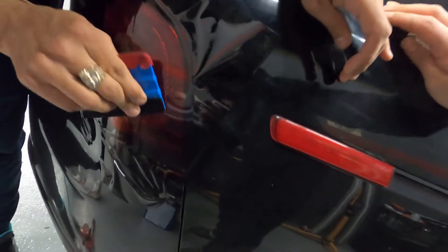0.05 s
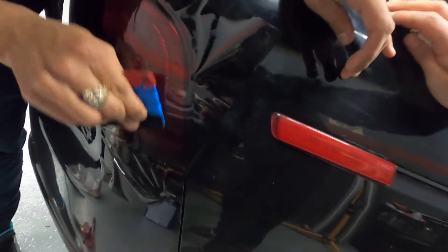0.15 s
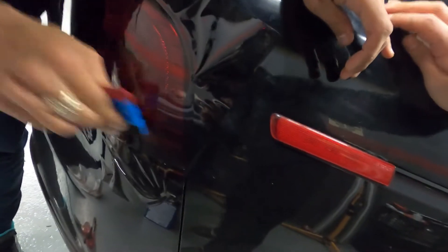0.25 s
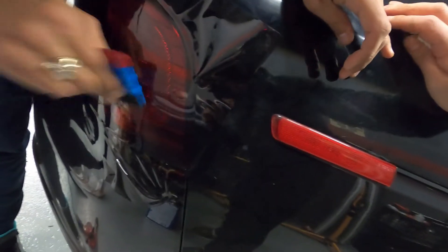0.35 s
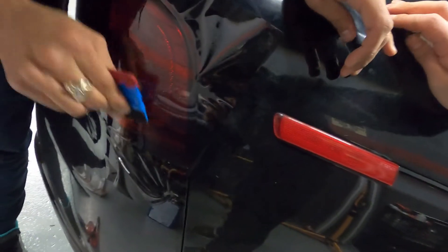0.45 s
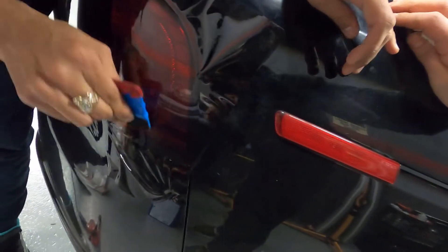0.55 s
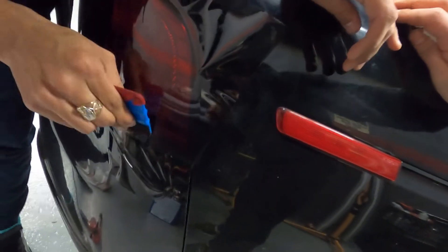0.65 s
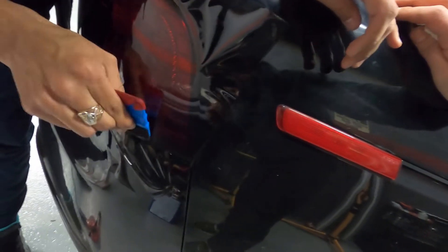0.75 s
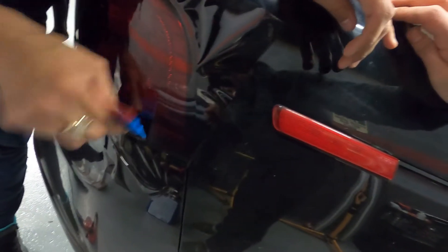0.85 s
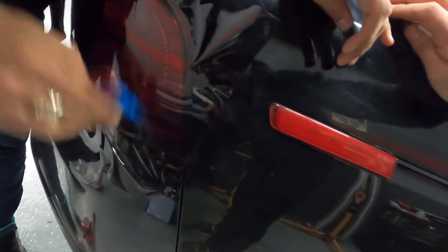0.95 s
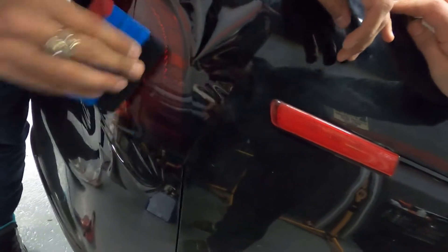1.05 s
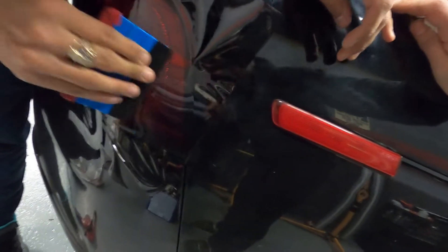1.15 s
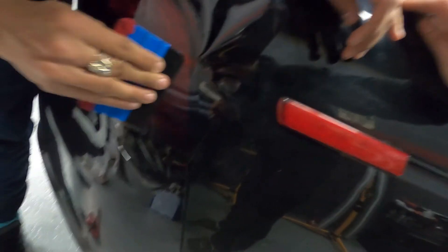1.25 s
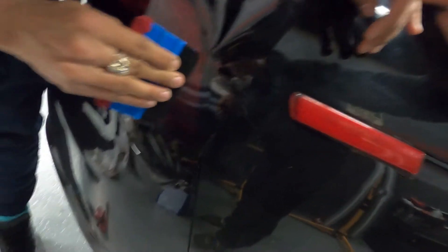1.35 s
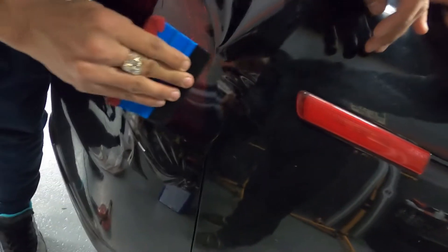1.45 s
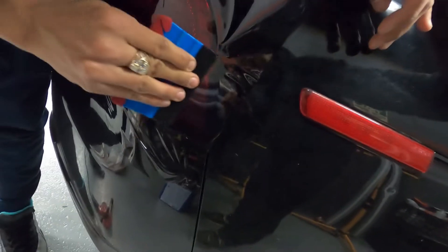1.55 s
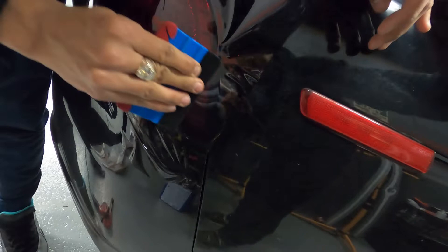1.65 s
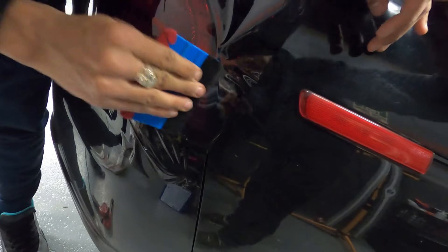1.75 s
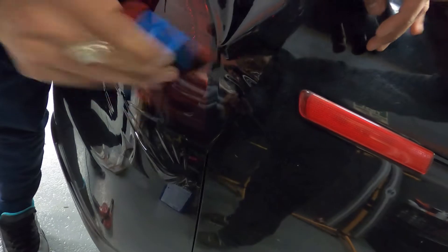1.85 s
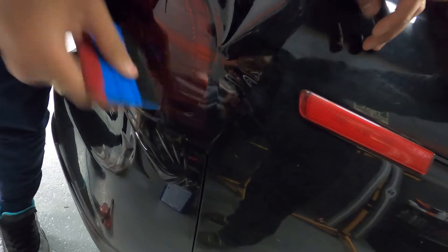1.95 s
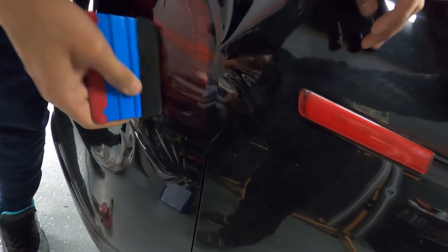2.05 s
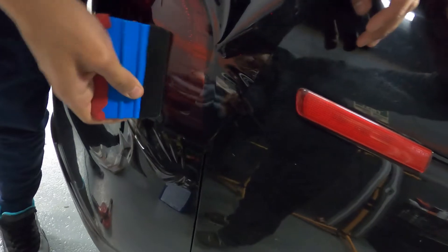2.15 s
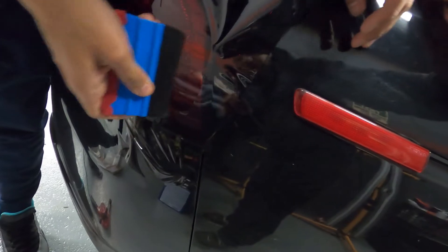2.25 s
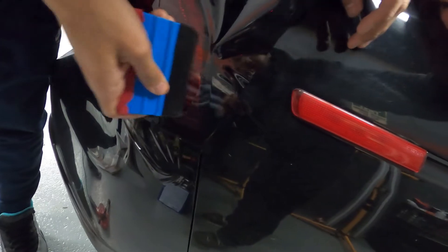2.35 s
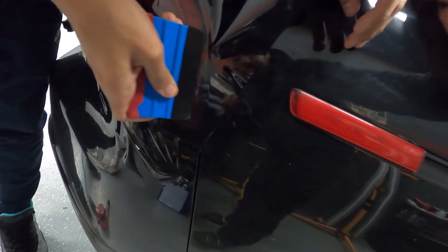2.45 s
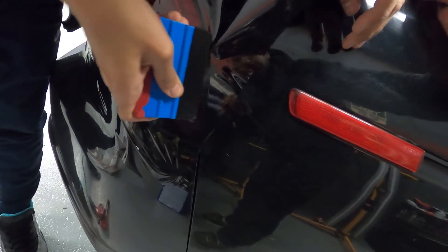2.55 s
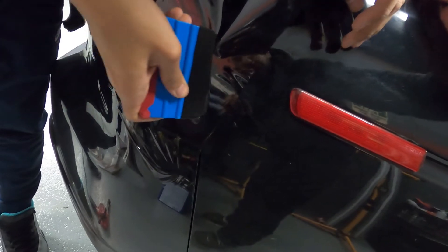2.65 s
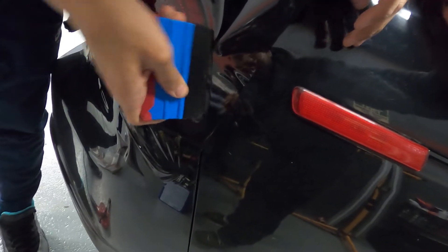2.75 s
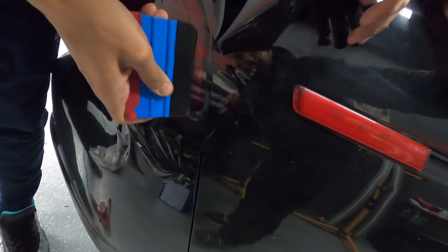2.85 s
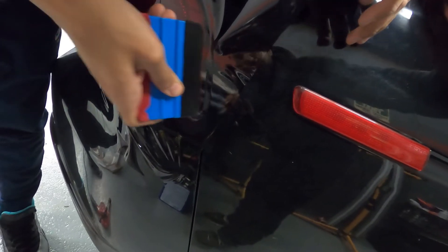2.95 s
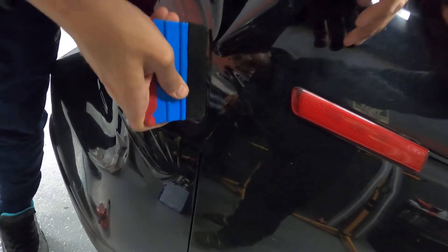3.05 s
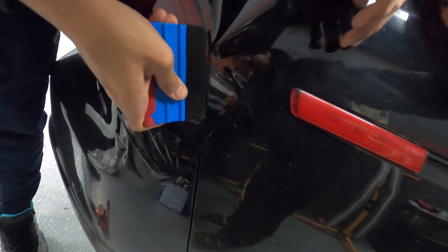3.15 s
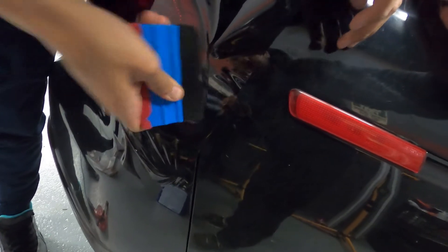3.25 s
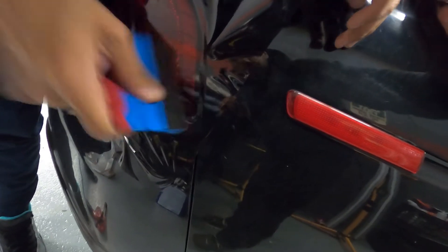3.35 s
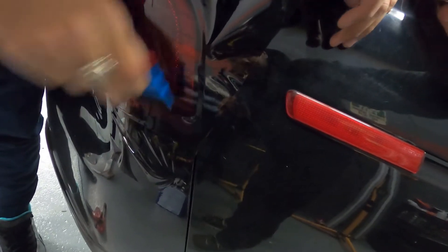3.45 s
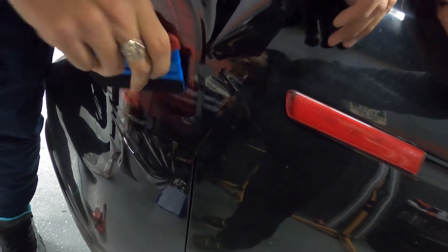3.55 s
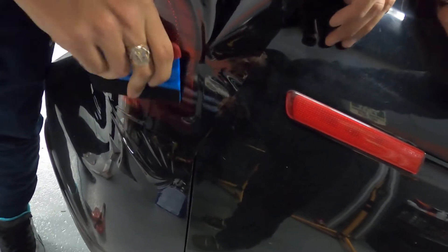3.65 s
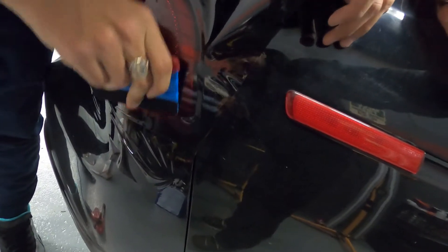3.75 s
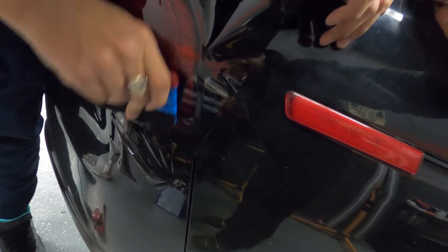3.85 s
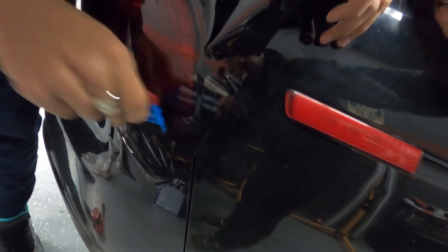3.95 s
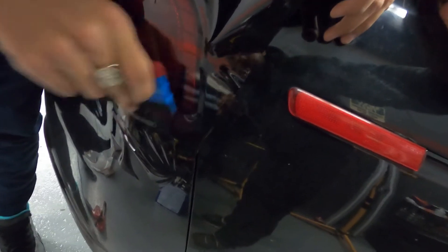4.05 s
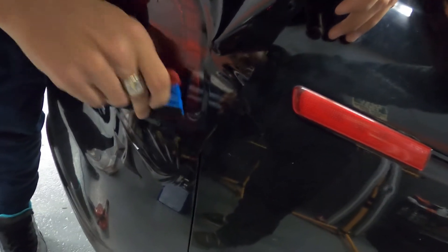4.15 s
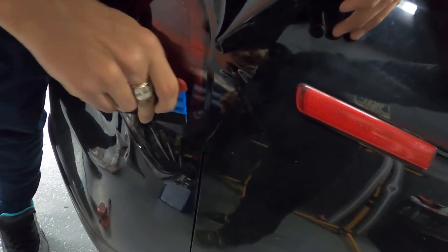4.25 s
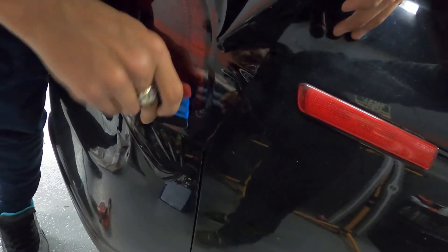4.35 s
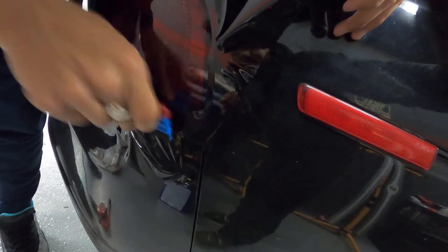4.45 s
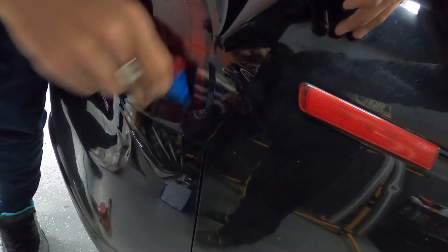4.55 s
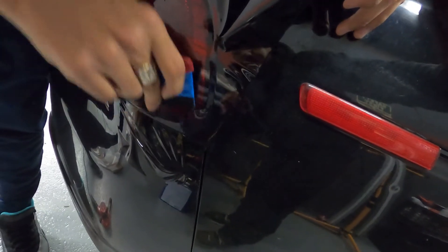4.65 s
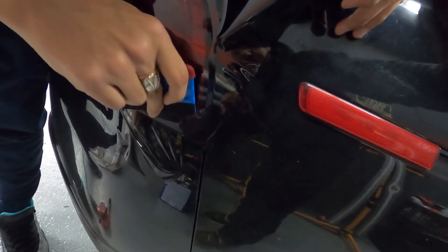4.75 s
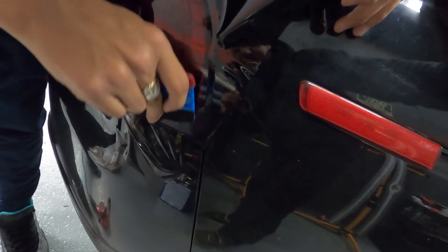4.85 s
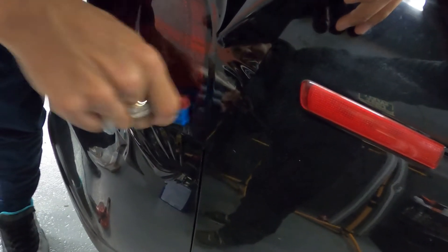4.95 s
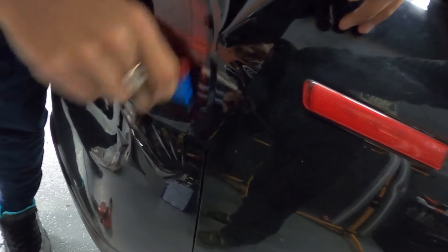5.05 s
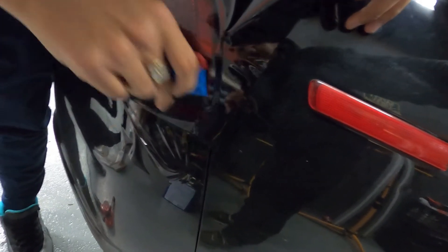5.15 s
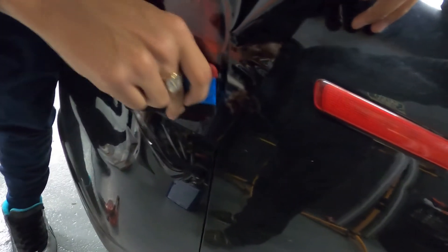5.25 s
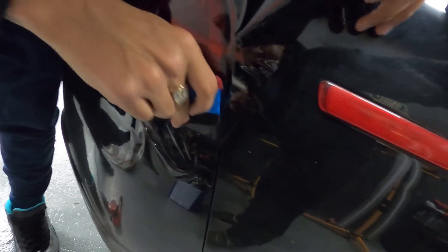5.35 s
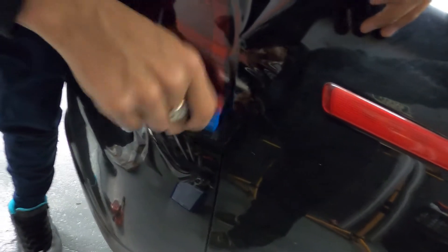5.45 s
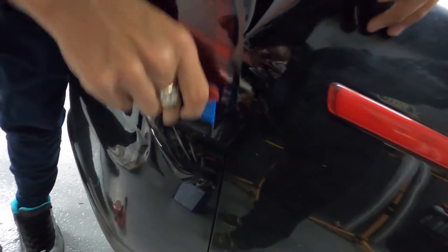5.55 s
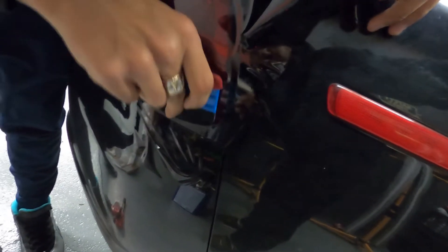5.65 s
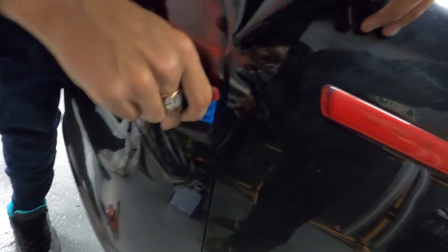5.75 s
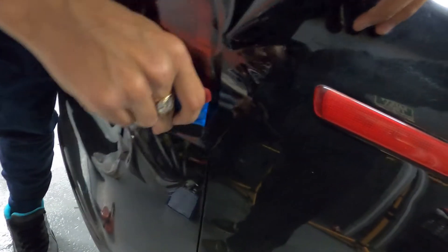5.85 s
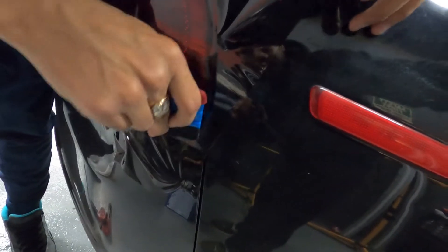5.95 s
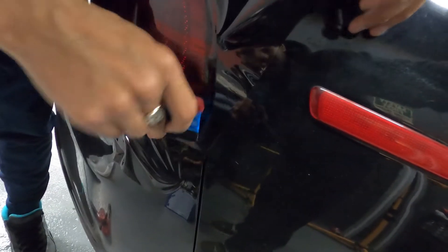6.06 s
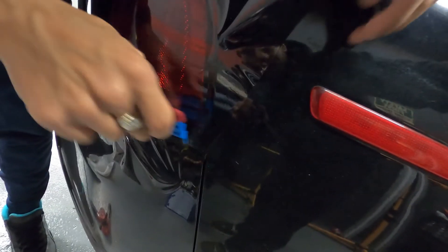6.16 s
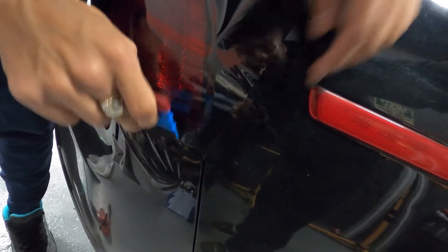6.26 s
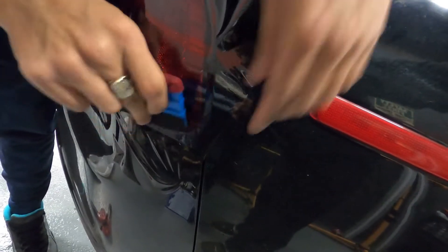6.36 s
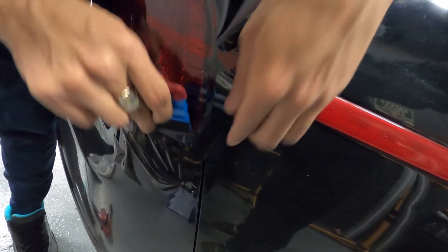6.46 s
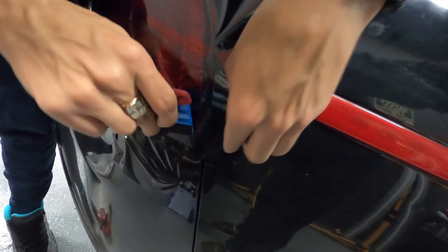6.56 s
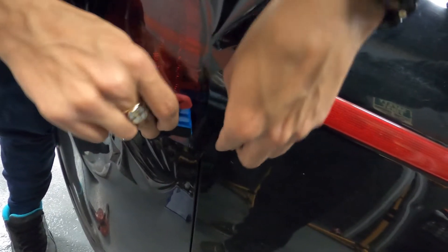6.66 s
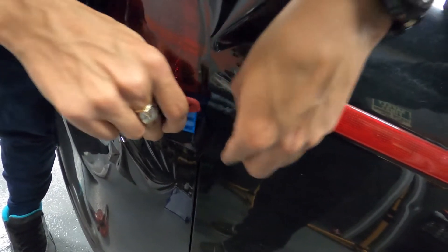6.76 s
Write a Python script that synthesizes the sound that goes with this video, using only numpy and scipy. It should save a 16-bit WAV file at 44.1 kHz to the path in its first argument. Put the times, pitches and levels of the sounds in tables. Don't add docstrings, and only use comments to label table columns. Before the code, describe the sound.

A small close stereo microphone hears a puff of air and a dull knock, then a dry squeegee glide and two firm clicks on a lamp. Quiet pressed scraping and tiny catches follow, then spaced clicks with hollow thuds. Two piercing film cracks arrive near the end, each followed by crisp fluttering scrape, and two last sharp taps fade into rubbing over low garage hum.

```python
import sys
import numpy as np
from scipy import signal
from scipy.io import wavfile
from scipy.ndimage import uniform_filter1d, minimum_filter1d

SR = 44100
rng = np.random.default_rng(int(sys.argv[2]) if len(sys.argv) > 2 else 0)


def linear_from_db(decibels):
    return 10 ** (np.asarray(decibels, float) / 20)


def unload_wav(signal):
    wavfile.write(
        sys.argv[1],
        SR,
        np.round(np.clip(np.atleast_2d(signal).T, -1, 1) * 32767).astype(np.int16),
    )


N = 299649

# pitch_hz, level_db [dB per Hz]
HUM_COLOUR = [(53, -52), (90, -32.5), (118, -28), (141, -6), (199, -11), (215, -5.5), (233, -9), (350, -16),
              (537, -33), (584, -31.5), (650, -33.5), (840, -62.5), (1430, -120)]
HISS_COLOUR = [(260, -41), (450, 3.5), (830, -7.5), (1010, 3), (1400, -5), (2070, -4), (2830, -8.5),
               (3990, -13), (6730, -11), (12600, -30.5), (16000, -39.5)]
AIR_COLOUR = [(8.8, -32.5), (15, -8.5), (32, 0), (54, 0.5), (71, -9.5), (92, -21), (120, -17), (160, -41),
              (260, -120)]
# peak_s, level_db, half_length_s
PUFFS = [(0, -60, 0.17), (.5, -71, 0.32), (1.153, -76, .35), (2.08, -74, 0.35), (2.403, -69, 0.36),
         (3.35, -73.5, 0.54), (3.57, -67, 0.094), (4.235, -80, 0.22), (4.568, -59, 0.046),
         (4.73, -70, 0.47), (5.73, -73, 0.2), (6.244, -63, 0.087), (6.432, -44.5, 0.03),
         (6.562, -54.5, 0.028)]
# start_s, length_s, level_db
LEANS = [
    (0.865, 0.35, -64),
    (2.218, 0.25, -60),
    (2.7, 0.34, -64),
    (3.252, 0.34, -66),
    (4.342, 0.56, -66),
    (5.6, .08, -54),
    (5.77, .1, -58),
    (6.235, .08, -52),
    (6.352, 0.05, -61),
]
# pitch_hz, width_hz, level_db [re hum]
HOLLOW_TONES = [(229.6, 14, -3.5), (158, 16, -5.5)]
# start_s, length_s, level_db
BRUSHES = [(0.018, 0.0067, -51.5), (1.15, 0.23, -74.5), (1.77, .22, -74.5), (2.006, 0.04, -62),
           (2.089, .08, -63.5), (2.682, 0.068, -71), (3.042, 0.11, -77), (3.403, 0.13, -69),
           (3.762, 0.5, -81.5), (4.005, 0.047, -69.5), (4.335, .05, -72), (4.415, .045, -76),
           (4.518, .004, -77), (4.53, .03, -74), (4.976, 0.11, -73.5), (5.13, .004, -82), (5.44, 0.11, -78),
           (5.62, 0.088, -59.5), (6.373, 0.073, -62), (6.453, 0.063, -53.5)]
# start_s, length_s, lens_db, film_db, change_db [by the end]
DRAGS = [(.03, .13, -63, -71, -2.5), (.16, 0.39, -65, -71, 10.5), (.53, 0.24, -49, -56, -21.5),
         (.78, 0.31, -67, -71.5, -2.5), (1.14, 0.071, -69, -74.5, 0), (1.25, .2, -60, -78, -10.5),
         (1.44, 0.1, -65.5, -79, 1), (1.57, 0.42, -74, -77, -3), (2.02, 0.29, -76, -75, 4),
         (2.27, 0.029, -57.5, -68.5, -2), (2.328, .06, -57, -70, -1.5), (2.325, 0.29, -58.5, -65, -10.5),
         (2.645, 0.061, -58.5, -72, -16), (2.72, 0.055, -58, -73, -14), (2.8, 0.14, -81, -80, 6),
         (3.02, 0.12, -70, -76.5, -5.5), (3.24, 0.17, -86.5, -81, 16.5), (3.38, 0.069, -68, -71, 0),
         (3.5, 0.29, -80, -74.5, -6), (3.7, .3, -68.5, -70.5, -7), (4.26, 0.34, -66, -73, -14),
         (4.75, 0.22, -65, -74.5, -11.5), (4.97, 0.15, -72, -82, -18.5), (5.25, 0.38, -62, -73.5, -10.5)]
# start_s, length_s, lens_db, film_db, change_db [by the end]
PEELS = [
    (5.585, 0.16, -48.5, -44.5, -4.5),
    (5.77, 0.37, -56, -50.5, -25.5),
    (6.17, .05, -74.5, -72, 10.5),
    (6.225, 0.16, -52, -45, 1),
    (6.4, 0.11, -55, -47, 0.5),
    (6.528, 0.007, -48, -41.5, 0),
    (6.55, 0.13, -67, -59.5, -1.5),
    (6.7, 0.12, -65, -63, -4),
]
# pitch_hz, level_db [dB per Hz]
RUB_COLOURS = [
    [(360, -43.5), (620, -7.5), (833, -15.5), (898, -5.5), (1230, -4), (1950, -1), (2210, -9.5), (3400, -7.5), (4600, -24), (7040, -120)],
    [(360, -30), (620, -2.5), (943, -2.5), (1100, 3.5), (1550, 4.5), (2190, -6.5), (2290, -14.5), (3200, -12), (4160, -34), (7040, -120)],
]
# pitch_hz, level_db [dB per Hz]
CHATTER_COLOURS = [
    [(1290, -30.5), (2200, -2.5), (2620, -3), (3570, -4), (4590, -3.5), (7000, -17.5), (9100, -33.5), (15400, -120)],
    [(1290, -45.5), (2200, -10.5), (2550, -6.5), (2770, -10), (2960, -5.5), (3350, -4), (4400, -1.5), (5130, -9), (5570, -13), (6050, -15.5), (7500, -20.5), (9750, -54), (16500, -120)],
]
# pitch_hz, level_db [dB per Hz]
SKIN_COLOUR = [(2940, -42.5), (5000, -8), (5700, 1), (6890, 4.5), (10700, -10.5), (12200, -12.5),
               (14400, -20.5), (15400, -31.5), (16000, -44.5)]
# start_s, click_peak_db, rebounds_hz, boom_db [re click], contact_ms
LANDINGS = [(0.0215, -28, 730, -8, 0.095), (0.5071, -16, 930, -13.5, 0.076),
            (1.2275, -16.5, 885, -12, 0.07), (2.112, -51, 430, 15.5, 0.44),
            (2.248, -55.5, 420, 12.5, 0.094), (3.488, -38, 930, 2.5, 0.25), (3.6757, -29, 855, -4, 0.11),
            (4.2386, -22, 865, -7, 0.07), (4.7258, -24, 825, -5.5, 0.097), (5.2276, -23, 835, -8.5, 0.09),
            (5.7534, -29, 900, -6, 0.095), (6.3948, -26, 1050, -12.5, 0.048),
            (6.5423, -24, 980, -27, 0.099)]
# start_s, peak_db, pitch_hz,
# t60_s
SHORT_PINGS = [(0.0218, -26, 270, .035), (0.5093, -20, 1070, .011), (0.5086, -27, 4400, .005),
               (1.2295, -25, 900, .028), (1.2294, -34, 2620, .018), (3.4898, -31, 870, .022),
               (3.4901, -31, 1195, .022), (3.6779, -37, 915, .022), (3.6785, -39, 1420, .03),
               (4.2406, -35, 1625, .02), (4.2405, -35, 1205, .022), (4.2399, -33, 2700, .008),
               (4.7278, -36, 1614, .022), (4.7281, -34, 925, .015), (5.2298, -21, 958, .024),
               (5.2303, -28, 1600, .022), (5.2289, -29, 3200, .007), (5.5822, -25, 1130, .016),
               (5.5821, -25, 1595, .018), (5.7553, -34, 1604, .016), (6.3965, -32, 460, .016),
               (6.5434, -27, 1070, .02), (6.5433, -29, 860, .02), (6.556, -40, 90, .09)]
# pitch_hz, level_db, t60_s
HOUSING_MODES = [(124, -28, 0.029), (146.6, -4.5, 0.17), (183.5, 2.5, 0.14), (225, 6, 0.081),
                 (285, -12, 0.11), (396, -8.5, 0.083), (505.3, -13, 0.11)]
# pitch_hz, level_db [dB per Hz]
KNOCK_COLOUR = [(410, -17.5), (700, -2), (1070, -7), (1500, -5.5), (3400, -16.5), (4650, -21.5),
                (5200, -28.5), (7770, -31.5), (11200, -56), (14000, -70)]
# start_s, peak_db, t60_s
HAND_THUMP = (.032, -22, 0.2)
# pitch_hz, level_db [dB per Hz]
THUMP_COLOUR = [(29, -46), (50, -13), (220, 4), (306, -4.5), (385, 2.5), (476, -14.5), (578, -9.5),
                (742, -18.5), (1370, -18.5), (2230, -31), (5000, -36), (6500, -56), (11000, -120)]
# start_s, peak_db, t60_s
SCUFF = (.0214, -28, .045)
# start_s, peak_db, pitch_hz, t60_s
MURMURS = [
    (.115, -52, 1800, .12),
    (.27, -55, 1980, .5),
    (.512, -46, 905, .2),
    (3.492, -46, 900, .12),
    (5.757, -38, 232, .16),
    (6.61, -57, 290, 1.2),
    (1.234, -33, 240, .1),
    (4.246, -38, 190, .14),
    (4.734, -38, 190, .14),
]
# start_s, peak_db, pitch_hz, t60_s
LENS_RINGS = [
    (1.232, -42, 893, 0.49),
    (2.112, -46, 565, 0.08),
    (3.491, -58, 1320, 0.67),
    (3.679, -45, 1300, 0.15),
    (4.244, -46, 1303, 0.57),
    (4.729, -47.5, 1300, 0.4),
    (5.233, -40, 940, 0.45),
]
# start_s, peak_db, pitch_hz, crack_db [re peak], length_s
SLIPS = [(0.648, -52, 1720, -39.5, 0.0095), (0.915, -56.5, 1920, -7.5, 0.0091),
         (1.504, -41, 2420, 1, 0.003), (1.638, -62, 1410, -3, 0.006), (3.067, -62, 1825, -14, 0.0038),
         (3.369, -51.5, 2000, 4.5, 0.01), (3.423, -52.5, 2530, -32, 0.021),
         (3.999, -52.5, 2030, -1.5, 0.0079), (6.355, -49, 2390, -19, 0.0039),
         (6.3935, -29, 3000, -5.5, 0.0045), (6.442, -34, 1590, -14, 0.0078), (6.533, -36, 2660, -3, 0.007),
         (6.5445, -29, 1010, -14.5, 0.0037), (6.608, -45, 950, -22, 0.005)]
# start_s, peak_db, pitch_hz
STUTTER = [(2.275, -61, 1600), (2.294, -48, 860), (2.333, -48, 900), (2.349, -46, 970), (2.377, -50, 1050),
           (2.388, -51, 1330), (2.415, -49, 900), (2.434, -45.5, 1010), (2.482, -45.5, 1170),
           (2.505, -44, 1070), (2.62, -39, 1370), (2.6415, -38.5, 1320), (2.66, -49, 1220),
           (2.679, -55, 1190), (2.735, -49, 1480), (2.831, -53.5, 1650)]
# start_s, peak_db, pitch_hz
NUDGES = [
    (1.019, -60, 318),
    (1.952, -57, 393),
    (2.394, -51, 307),
    (2.83, -59, 301),
]
# pitch_hz, level_db [dB per Hz]
CRACK_COLOUR = [(880, -23.5), (1500, -7.5), (2610, -10), (3350, -2.5), (4730, -7.5), (6240, -9),
                (8570, -14), (9650, -18), (13400, -30.5), (16000, -47)]
# start_s, peak_db, low_click_db, boom_db, ring_db [last three re peak]
SNAPS = [
    (5.58, -0.5, -28.5, -31, -24),
    (6.2201, 1, -21, -35, -25.5),
]
# pitch_hz, level_db [dB per Hz]
SNAP_COLOURS = [
    [(470, -48), (850, -13), (1500, -4.5), (2590, -9), (3780, -6), (5120, -15), (6670, -8), (8810, -0.5), (9750, -12.5), (13400, -25), (16400, -35)],
    [(470, -56), (800, -16), (1360, -7), (2280, -20), (3460, -8), (4690, -1), (8480, 0), (9150, -2.5), (9870, -16.5), (12100, -19), (16400, -42)],
]
EDGE_HZ = [6530, 3710]
# pitch_hz, t60_s
GARAGE_DECAY = [(150, 1), (1000, 0.55), (4000, 0.65), (10000, 0.64)]
# early_s, level_db
GHOSTS = [(0.0104, -24), (0.0214, -34.5)]


def evened(x):
    return x / np.sqrt(np.mean(x ** 2) + 1e-20)


def peaked(x):
    return x / abs(x).max()


def read(points, hz):
    f, value = np.transpose(points)
    return np.interp(np.log(hz + 1), np.log(f + 1), value)


def add(mix, s, sound):
    part = mix[round(s * SR):][:len(sound)]
    part += sound[:len(part)]


def friction(colours, s, level_db, same, grain_db, patchy_db, size=256, change_s=0):
    z = rng.standard_normal((2, N))
    z *= linear_from_db(grain_db * evened(uniform_filter1d(rng.standard_normal(N), 150)))
    z[1] = same * z[0] + np.sqrt(1 - same ** 2) * z[1]
    hz, t, spec = signal.stft(z, SR, nperseg=size)
    patches = rng.standard_normal(spec.shape[::-1][:2])
    patches = uniform_filter1d(uniform_filter1d(patches, 8, axis=0), 5, axis=1)
    before = evened(linear_from_db(read(colours[0], hz)))[:, None]
    after = evened(linear_from_db(read(colours[-1], hz)))[:, None]
    spec = spec * np.where(t < change_s, before, after) * linear_from_db(patchy_db * evened(patches).T)
    sound = evened(signal.istft(spec, SR, nperseg=size)[1][:, :N])
    return sound * linear_from_db(np.interp(np.arange(N) / SR, s, level_db))


def effort(rows, floor_db=-100, soft=()):
    grip_s, soft_grip_s, lift_s = 0.003, 0.03, 0.026
    t = np.arange(0, N, 32) / SR
    power = linear_from_db(2 * floor_db)
    for k, (s, length, db, change_db) in enumerate([*rows, *soft]):
        u = t - s
        rise_s = grip_s if k < len(rows) else min(soft_grip_s, length / 2)
        gate = np.clip(u / rise_s, 0, 1) * np.exp(-2 * np.clip(u - length, 0, 1) / lift_s)
        power = power + gate * linear_from_db(2 * (db + change_db * np.clip(u / length, 0, 1)))
    return t, 10 * np.log10(power)


def lens(noise, hz, t60, width_hz=260):
    t = np.arange(len(noise)) / SR
    edges = [hz - width_hz / 2, hz + width_hz / 2]
    band = signal.sosfilt(signal.butter(2, edges, btype="band", fs=SR, output="sos"), noise)
    return peaked(band * linear_from_db(-60 * t / t60) * (1 - np.exp(-t / 0.00077)))


def hollow(s, level_db):
    tones = np.zeros(N)
    for hz, width_hz, db in HOLLOW_TONES:
        tones += linear_from_db(db) * evened(lens(rng.standard_normal(N), hz, np.inf, width_hz))
    return tones * linear_from_db(np.interp(np.arange(N) / SR, s, level_db))


def air():
    still_db, puff_drop_db = -89, -14.5
    t = np.arange(0, N, 64) / SR
    power = linear_from_db(2 * still_db)
    for s, db, half_s in PUFFS:
        power = power + linear_from_db(2 * (db + puff_drop_db * abs(t - s) / half_s))
    return linear_from_db(6.0) * friction([AIR_COLOUR], t, 10 * np.log10(power), same=0.92, grain_db=0.3,
                               patchy_db=2.5, size=4096)


def floor():
    hum_db, hiss_db = -68, -76
    panel_db, panel_s, panel_fade_db = -22.5, 0.23, -16.5
    panel = [(s, panel_s, db + boom_db + panel_db, panel_fade_db) for s, db, _, boom_db, _ in LANDINGS]
    panel += [(s, length, db, panel_fade_db / 2) for s, length, db in LEANS]
    t, level_db = effort(panel, hum_db)
    out = linear_from_db(2.5) * friction([HUM_COLOUR], t, level_db, same=0.32, grain_db=0.3, patchy_db=1.1, size=2048)
    out += friction([HISS_COLOUR], [0, N / SR], [hiss_db, hiss_db], same=0.3, grain_db=0.4, patchy_db=1.2)
    return out + air() + hollow(t, level_db)


def rubbing():
    glide_ends_s, edge_loose_s = 1.2, 5.58
    flat_skin_db, loose_skin_db = -8.5, -20.5
    drags = DRAGS + PEELS
    rubbed = [(s, length, db, change) for s, length, db, _, change in drags]
    film = [(s, length, db, change) for s, length, _, db, change in drags]
    skin = [(s, length, db + flat_skin_db, change) for s, length, _, db, change in DRAGS]
    skin += [(s, length, db + loose_skin_db, change) for s, length, _, db, change in PEELS]
    grip = [(s, length, db, -4) for s, length, db in BRUSHES]
    out = friction(RUB_COLOURS, *effort(rubbed), same=0.73, grain_db=1.7, patchy_db=2.63,
                   change_s=glide_ends_s)
    out += friction(CHATTER_COLOURS, *effort(film, soft=grip), same=0.34, grain_db=1.4, patchy_db=1.6,
                    change_s=edge_loose_s)
    return out + friction([SKIN_COLOUR], *effort(skin, soft=grip), same=0.51, grain_db=3.3, patchy_db=4.2)


def contact(ms):
    u = (np.arange(120) / SR - 0.001) / (0.0013 * np.clip(ms, 0.04, 0.3))
    return peaked((u - 0.1 * (1 - u ** 2)) * np.exp(-u ** 2 / 2))


def click(hz, t60, rise_s=0.00005):
    t = np.arange(2000) / SR
    rise = 1 - (1 + t / rise_s) * np.exp(-t / rise_s)
    return peaked(-np.sin(2 * np.pi * hz * t) * linear_from_db(-60 * t / t60) * rise)


def burst(noise, t60, colour, first=7.5):
    hz = abs(np.fft.fftfreq(4096, 1 / SR))
    log_gain = np.log(linear_from_db(np.maximum(read(colour, hz), -70)))
    body = np.fft.ifft(np.exp(np.conj(signal.hilbert(log_gain)))).real[:2048]
    shower = noise * linear_from_db(-60 * np.arange(len(noise)) / SR / max(t60, 0.001))
    shower[0] = -first
    return peaked(signal.oaconvolve(shower, body))


def housing(chance, rise_s, spread):
    t = np.arange(SR // 3) / SR
    boom = np.zeros(len(t))
    for (hz, db, t60), detune, louder in zip(HOUSING_MODES, chance, chance[::-1]):
        boom += linear_from_db(db - 60 * t / t60 + 2 * louder) * np.sin(2 * np.pi * hz * (1 + spread * detune) * t)
    return peaked(boom * (1 - np.exp(-t / rise_s)))


def landings():
    lens_db, lens_db_per_ms = -25, 58
    out = np.zeros(N)
    chances = rng.standard_normal((len(LANDINGS), SR // 3))
    for (s, db, hz, boom_db, ms), z in zip(LANDINGS, chances):
        for k, rebound_db in enumerate([1.5, -2.5, -9, -15.5]):
            add(out, s + 0.00069 + k / hz, linear_from_db(db + rebound_db) * contact(ms * (1 + 0.45 * k)))
        add(out, s + 0.0013, -linear_from_db(db - 1.5) * click(hz, 0.0086, ms * 0.0012))
        add(out, s + 0.001464, linear_from_db(db - 0.6 - 61.5 * ms) * burst(z[:4096], 0.04, KNOCK_COLOUR, first=6.9))
        hum = lens(z[::-1], 1.06 * hz, 0.16, width_hz=620)
        add(out, s + 0.0026, linear_from_db(db + lens_db + lens_db_per_ms * ms) * hum)
        add(out, s + 0.00496, linear_from_db(db + boom_db + 3) * housing(z[7:14], 0.0022, spread=0.012))
    for s, db, hz, t60 in SHORT_PINGS:
        add(out, s, linear_from_db(db) * click(hz, t60, rise_s=0.18 / hz))
    z = rng.standard_normal(SR // 3)
    for (s, db, t60), colour in ((HAND_THUMP, THUMP_COLOUR), (SCUFF, KNOCK_COLOUR)):
        add(out, s, linear_from_db(db) * burst(z, t60, colour))
    return out


def patches_ringing(rows):
    out = np.zeros(N)
    for (s, db, hz, t60), z in zip(rows, rng.standard_normal((len(rows), SR // 2))):
        add(out, s, linear_from_db(db) * lens(z, hz, t60, width_hz=11 * np.sqrt(hz / t60 / 8)))
    return out


def slips(sharp, dull):
    dull_crack_db, dull_s = -30, 0.003
    out = np.zeros(N)
    rows = sorted(sharp + [(*row, dull_crack_db, dull_s) for row in dull])
    for (s, db, hz, crack_db, length), z in zip(rows, rng.standard_normal((len(rows), 2048))):
        catches = z ** 3 * abs(z) / 2 * np.exp(-np.arange(len(z)) / SR / max(length, 0.0005))
        catches[0] = 22
        blade = click(hz, 0.0076, 0.00016) + 0.5 * click(1.55 * hz, 0.004)
        add(out, s + 0.0016, linear_from_db(db) * peaked(signal.oaconvolve(catches, blade)))
        fractures = burst(z[::-1], 3 * length, CRACK_COLOUR, first=0.54)
        add(out, s + 0.00054, linear_from_db(db + crack_db + 9.0) * fractures)
    return out


def snaps():
    out = np.zeros(N)
    chances = rng.standard_normal((len(SNAPS), SR // 3))
    for (s, db, low_db, boom_db, ring_db), colour, edge_hz, z in zip(SNAPS, SNAP_COLOURS, EDGE_HZ, chances):
        add(out, s + 0.0016, -linear_from_db(db) * burst(z[:2048], 0.007, colour, first=5.7))
        add(out, s + 0.00141, linear_from_db(db + low_db) * click(1380, 0.0028))
        add(out, s + 0.0016, -linear_from_db(db - 4.0) * click(edge_hz, 0.0035))
        add(out, s + 0.0026, linear_from_db(db + ring_db) * lens(z[::-1], 4300, 0.055, width_hz=1600))
        add(out, s + 0.0045, linear_from_db(db + boom_db) * housing(z[7:14], 0.0015, spread=0.016))
    return out


def drumming():
    drum_db = -6.5
    flaps = [(s, length, db + drum_db, change) for s, length, db, _, change in PEELS[3:]]
    return friction([THUMP_COLOUR], *effort(flaps), same=0.9, grain_db=2.5, patchy_db=3.0, size=1024)


def garage(x):
    echo = np.zeros((2, SR))
    at = np.arange(200, SR - 20, 20)
    at = at + rng.integers(0, 20, (2, len(at)))
    np.put_along_axis(echo, at, rng.choice([-1., 1.], at.shape), 1)
    hz, t, z = signal.stft(echo, SR, nperseg=256)
    decay = linear_from_db(-60 * t / read(GARAGE_DECAY, hz)[:, None])
    tail = signal.istft(z * decay, SR, nperseg=256)[1]
    return signal.fftconvolve(x[None], tail / np.linalg.norm(tail[0]), axes=1)[:, :N]


def ports(x, lag, shade, left_db):
    left = signal.lfilter([1 - shade], [1, -shade], np.roll(x, lag))
    return np.array([linear_from_db(left_db) * left, x])


def scene():
    knocks = landings() + patches_ringing(LENS_RINGS) + slips(SLIPS, STUTTER)
    cracks = snaps()
    bed = rubbing() + floor() + drumming()
    room = garage(linear_from_db(-17.5) * knocks + linear_from_db(-29.0) * cracks)
    knocks = knocks + patches_ringing(MURMURS) + slips([], NUDGES)
    hits = ports(knocks, lag=1, shade=0.15, left_db=-0.7)
    hits += linear_from_db(1.5) * ports(cracks, lag=1, shade=0.45, left_db=-0.6)
    return bed + hits + room


def low_pass(x):
    return signal.sosfilt(signal.butter(12, 16510, fs=SR, output="sos"), x)


def record(dry):
    ceiling = 0.86
    gain = np.minimum(ceiling / (abs(dry).max(0) + 1e-9), 1)
    held = dry * uniform_filter1d(minimum_filter1d(gain, size=257), size=128)
    dull = signal.lfilter([0.35], [1, -0.65], held)
    wet = held + sum(linear_from_db(db) * np.roll(dull, -round(s * SR), axis=1) for s, db in GHOSTS)
    return low_pass(wet)


dry = scene()
out = record(dry)
unload_wav(out)
```